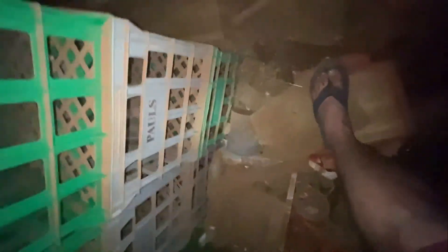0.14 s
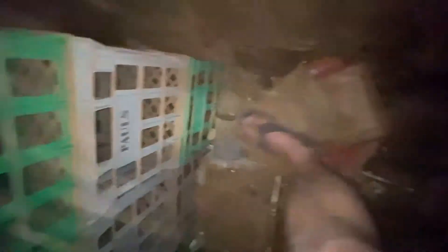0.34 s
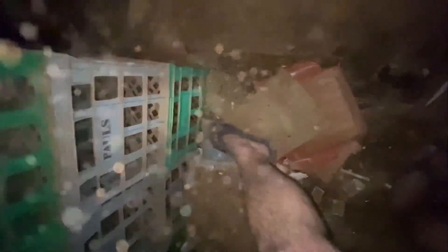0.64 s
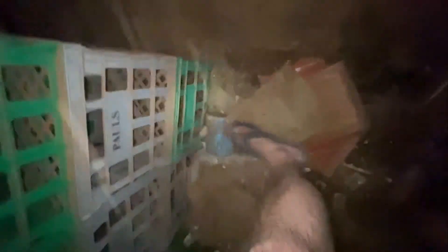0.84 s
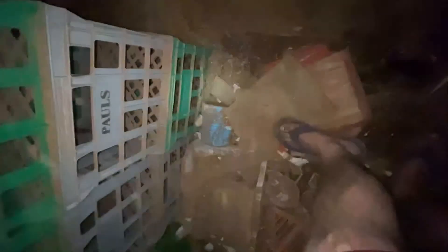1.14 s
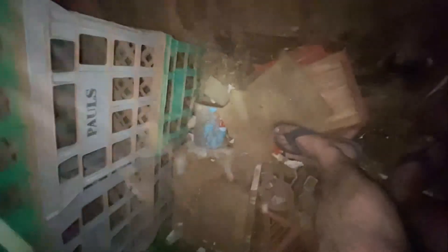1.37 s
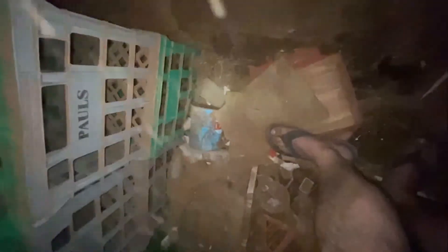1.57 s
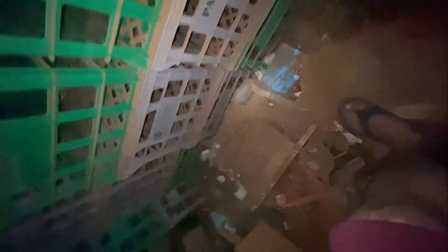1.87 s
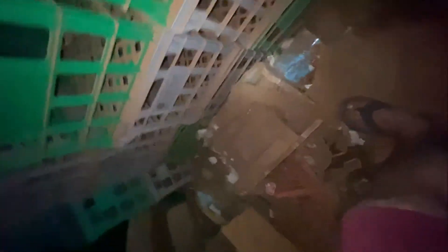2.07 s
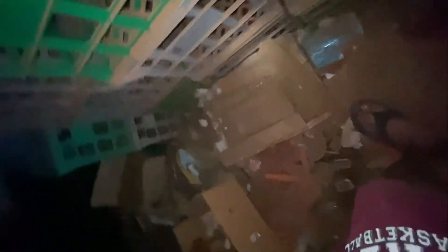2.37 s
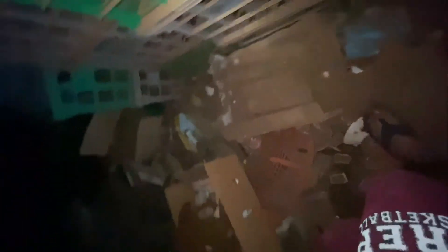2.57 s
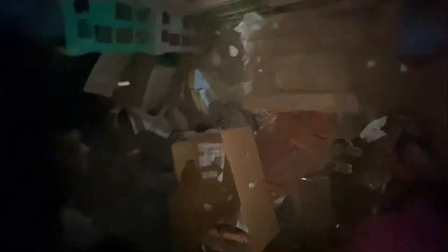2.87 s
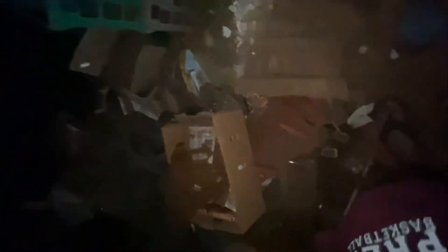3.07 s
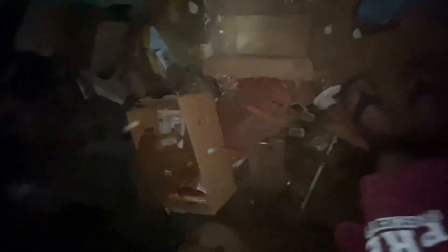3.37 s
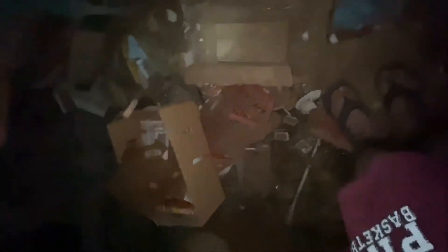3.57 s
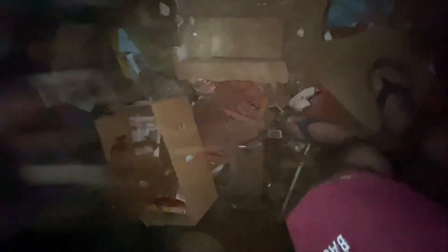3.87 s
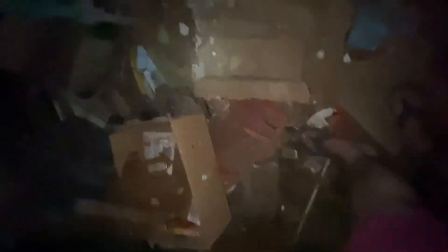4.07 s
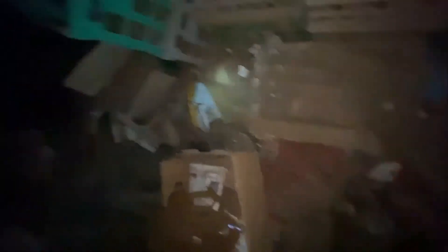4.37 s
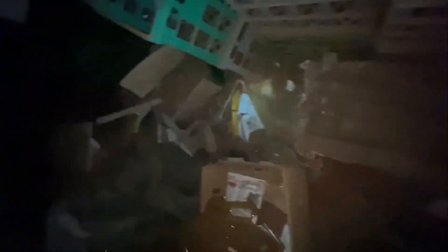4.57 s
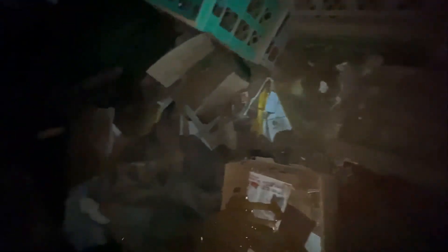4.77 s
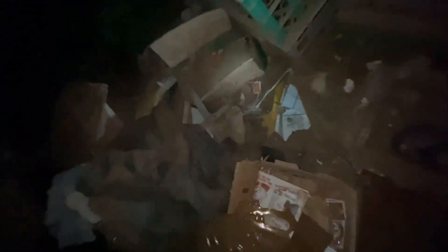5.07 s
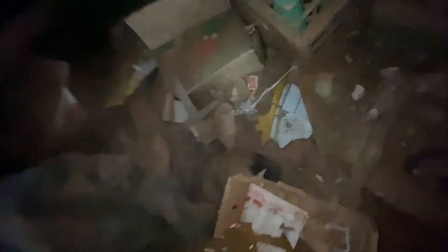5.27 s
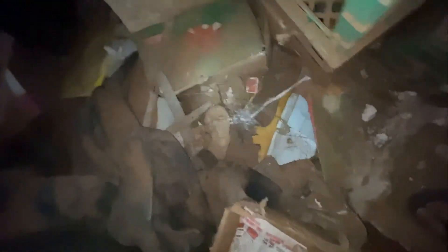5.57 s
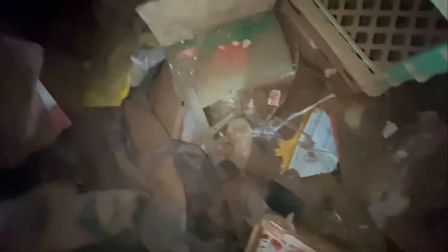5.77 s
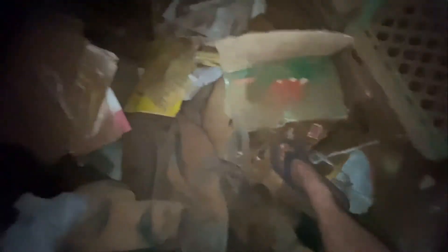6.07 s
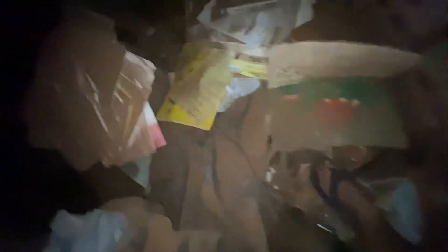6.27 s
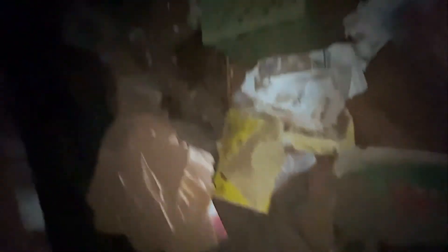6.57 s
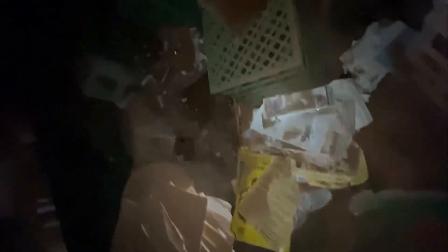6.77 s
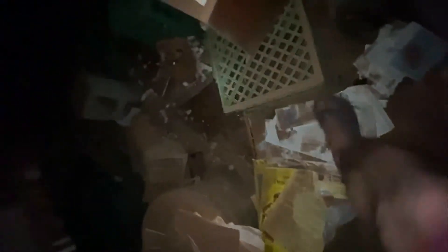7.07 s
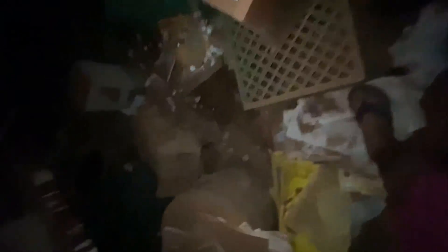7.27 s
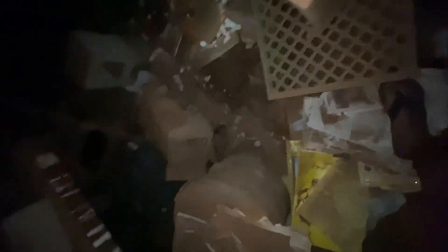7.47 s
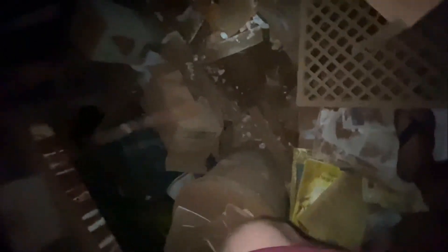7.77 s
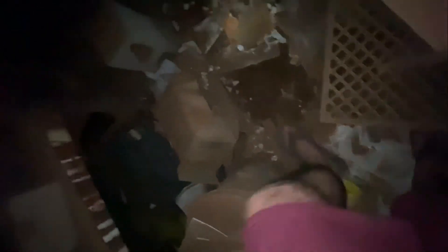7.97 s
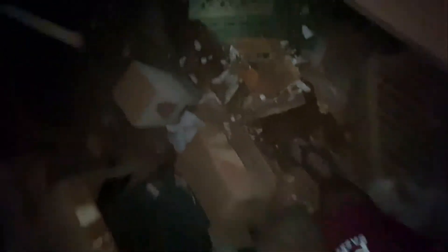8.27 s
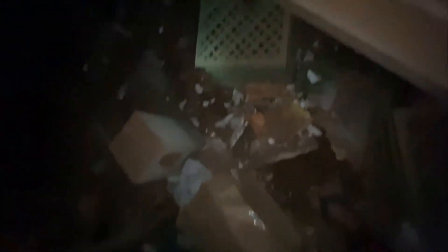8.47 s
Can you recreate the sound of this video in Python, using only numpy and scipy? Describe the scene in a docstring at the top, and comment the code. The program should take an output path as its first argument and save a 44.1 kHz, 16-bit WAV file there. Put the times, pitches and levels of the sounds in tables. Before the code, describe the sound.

A close, dry stereo perspective in an open shed with a short scattered tail and very faint low air. After a light scuff, a plastic crate is shoved at about 0.5 s, juddering and ringing hollowly until 0.7, with small scrapes and ticks to 1.1. A quiet gap follows. From 1.8 rubbing resumes, growing into firm cardboard-on-plastic scrapes at 2.4-2.9. At 3.1 a crate slams down, by far the loudest event: a hard knock, cracking rim and brief deep boom beneath. Smaller snaps follow, with a sharp cluster around 4.0 and a strong hollow box knock at 4.5. Dry scuffs and crackles come at 4.8-5.5, then near silence. At 6.1 a foot crunches into boxes and crisp wrappers; a soft low thump follows at 6.5. Another heavy, crackling tread lands at 7.1, then faint hollow rubbing, and light scuffs and soft knocks at 8.1-8.5.

```python
"""Plastic crates are shifted and cardboard and wrappers waded through, in sandals, close to the microphone.
The place is an open shed: rubbing noise scrapes and crinkles at each shove, edges snap as short noise bursts,
and struck boxes, feet and pushed crates ring as clusters of decaying modes.
Once a crate is set down hard: it knocks, its rim cracks, and the box under it booms.
A short scattered tail and faint low-heavy air surround it, heard through two close microphone ports."""
import sys
import numpy as np
from scipy import signal
from scipy.fft import rfft, irfft, next_fast_len
from scipy.io import wavfile
from scipy.ndimage import uniform_filter1d, map_coordinates

SR = 44100
rng = np.random.default_rng(int(sys.argv[2]) if len(sys.argv) > 2 else 0)


def dump(signal):
    """Clip the signal to [-1, 1] and save it as 16-bit WAV at the path in sys.argv[1]."""
    limited = np.clip(np.atleast_2d(signal).T, -1, 1)
    pcm = np.round(limited * 32767).astype(np.int16)
    wavfile.write(sys.argv[1], SR, pcm)


N = 380583

GRIP_DB_PER_S = 599.5  # how fast shoves and hums take hold
LOOSE_HZ = 1620  # middling pitch of the loose bits, and of the contact before any shove


def amp(db):
    """Decibels to gain."""
    return 10 ** (np.asarray(db) / 20)


def unit(x):
    """Scale to rms 1."""
    return x / np.sqrt(np.mean(x ** 2) + 1e-20)


def along(points, hz):
    """(frequency [Hz], value) points read on a log frequency axis."""
    f, v = np.transpose(points)
    return np.interp(np.log(hz + 1), np.log(f + 1), v)


def wobble(rate):
    """A smooth random curve, rate knots a second."""
    knots = rng.standard_normal(int(N * rate / SR) + 4)
    return map_coordinates(knots, [np.arange(N) * rate / SR])


def filtered(x, response):
    """x times a response of frequency."""
    n = x.shape[-1]
    m = next_fast_len(n + 8192)
    hz = np.fft.rfftfreq(m, 1 / SR)
    return irfft(rfft(x, m) * response(hz), m)[..., :n]


def coloured(x, spectrum):
    """x through a spectrum, at rms 1."""
    return unit(filtered(x, lambda hz: amp(along(spectrum, hz))))


def hump(hz, centre_hz, octaves):
    """Gain of a broad resonance."""
    return 1 / (1 + (np.log2((hz + 1) / centre_hz) / octaves) ** 2)


def add(track, s, sound):
    """Mix a sound into the track at a time."""
    part = track[round(s * SR):][:len(sound)]
    part += sound[:len(part)]


def swell(start_s, hold_s, rise_db_per_s, fall_db_per_s):
    """Gain that rises to 1 at the start, holds, then dies away."""
    t = np.arange(N) / SR - start_s
    db = rise_db_per_s * np.minimum(t, 0) - fall_db_per_s * np.maximum(t - hold_s, 0)
    gain, heard = np.zeros(N), db > -80
    gain[heard] = amp(db[heard])
    return gain


def effort():
    """Hollow, scrape and crinkle gains and contact pitch: shoves grip, hold, let go and leave litter settling."""
    # faint rustle between the shoves: (time [s], gain [dB])
    stir_points = [(0.0, -60), (0.46, -67), (0.6, -83.5), (1.71, -84.5), (1.9, -63), (3.27, -55.5),
                   (3.75, -72), (4.13, -53), (4.42, -60.5), (4.62, -82.5), (6.1, -59.5), (6.25, -52),
                   (7.07, -67), (7.26, -55), (7.64, -70), (8.63, -65)]
    # shoves: (start [s], hold [s], scrape gain [dB], hollow box over the scrape [dB],
    #          crinkle over the scrape [dB], resonance of the rubbed piece [Hz])
    shove_rows = [(0.12, .05, -54, -8, -4, 1487), (0.526, .015, -46.5, 0, 0.5, 2310),
                  (0.549, 0.069, -45.5, -1.5, 0.5, 1275), (0.7, 0.023, -50.5, -7, -0.5, 2985),
                  (0.792, 0.017, -53, 6.5, 2, 1094), (0.995, 0.02, -47.5, -6.5, -3.5, 1200),
                  (1.029, 0.036, -53.5, 5.5, -2, 600), (1.761, .11, -54, -1, -4.5, 1801),
                  (1.934, 0.02, -53, -4.5, -3.5, 3096), (2.005, 0.043, -52.5, -5, 0.5, 1525),
                  (2.107, 0.091, -51, 2, -5.5, 2990), (2.404, 0.074, -47.5, -15, -7.5, 2080),
                  (2.458, 0.045, -39, -6.5, -7, 2063), (2.532, .05, -38, -1, -5, 1085),
                  (2.644, 0.15, -56, -5, 1, 900), (2.92, 0.043, -38.5, -7, -11, 698),
                  (3.039, .03, -45, -5, -7, 741), (3.088, 0.055, -37.5, -5, -3.5, 2500),
                  (3.179, 0.11, -55, -0.5, -2, 732), (3.43, .15, -51.5, -3.5, -9, 1557),
                  (3.817, 0.019, -63, -1.5, -15, 3745), (3.92, .22, -48.5, -5, -2, 1130),
                  (4.256, 0.086, -53, 2, -5.5, 951), (4.4, 0.14, -44, -5, -5, 764),
                  (4.503, 0.014, -48, 11, 0, 768), (4.832, .03, -51, -16, -8, 3726),
                  (4.89, .08, -47, -15.5, -7.5, 2445), (5.011, .07, -55.5, 3, -1, 1892),
                  (5.317, 0.0097, -48.5, -8.5, -15, 719), (5.403, .08, -47.5, -7.5, -4.5, 2233),
                  (6.086, 0.11, -40.5, -1, -2.5, 700), (6.225, 0.046, -43, -4.5, -2.5, 1000),
                  (6.321, 0.2, -53.5, -3.5, -3, 2353), (6.598, 0.13, -59.5, 6.5, -11, 3703),
                  (6.739, 0.2, -63.5, -1, -6, 3800), (7.07, 0.016, -51.5, 1.5, -8.5, 1495),
                  (7.1, .115, -45, 2, -3, 1854), (7.253, .135, -51, 2, -4.5, 1415),
                  (7.459, .15, -59.5, -3.5, -9.5, 2600), (8.143, .02, -52, 0, -7, 1197),
                  (8.192, 0.25, -56.5, -4, -6, 2590), (8.31, 0.15, -54, 0.5, -7.5, 2984)]
    release_db_per_s, settle_db, settle_db_per_s = 328.5, -10.5, 113
    times, levels = np.transpose(stir_points)
    stir = amp(np.interp(np.arange(N) / SR, times, levels))
    power = np.outer(amp([-12, -4.5, -6.5]), stir) ** 2  # hollow, scrape, crinkle
    hardest, pitch_hz = np.zeros(N), np.full(N, float(LOOSE_HZ))
    for s, hold_s, db, hollow_db, crinkle_db, contact_hz in shove_rows:
        push = swell(s, hold_s, GRIP_DB_PER_S, release_db_per_s)
        settle = amp(settle_db) * swell(s, hold_s, GRIP_DB_PER_S, settle_db_per_s)
        gain = amp(db) * np.maximum(push, settle)
        power += np.outer(amp([hollow_db, 0, crinkle_db]) ** 2, gain ** 2)
        # the piece rubbed hardest sets the contact pitch
        pitch_hz = np.where(gain > hardest, contact_hz, pitch_hz)
        hardest = np.maximum(gain, hardest)
    hollow, scrape, crinkle = np.sqrt(power)
    return hollow, scrape, crinkle, pitch_hz


def slips(rate, spread_db, smooth, patchy_db):
    """Tiny uneven stick-slip pulses over smooth friction; the resonances shift as the contact moves."""
    chance, size, grit = rng.random(N), rng.standard_normal(N), rng.standard_normal(N)
    pulses = unit((chance < rate / SR) * np.sign(grit) * amp(spread_db * np.minimum(size, 2)))
    z = signal.stft(pulses + smooth * rng.standard_normal(N), nperseg=512)[2]
    # random gains, smoothed over frequency and then over time
    field = uniform_filter1d(rng.standard_normal(z.shape), size=2, axis=0)
    field = uniform_filter1d(field, size=7, axis=1)
    return signal.istft(z * amp(patchy_db * unit(field)), nperseg=512)[1][:N]


def resonating(x, pitch_hz):
    """The piece being rubbed adds a resonance of its own, which changes with the shoves."""
    hz, t, z = signal.stft(x, SR, nperseg=512)
    centre_hz = np.interp(t, np.arange(N) / SR, pitch_hz)
    contact = amp(-3) * hump(hz[:, None], centre_hz, octaves=.3)
    return unit(signal.istft(z * (1 + contact), SR, nperseg=512)[1][:N])


def rubbing(hollow_gain, scrape_gain, crinkle_gain, contact_hz):
    """Shoves drag card and plastic over each other: boxes drone, edges scrape, wrappers crinkle."""
    # spectra of boxes, edges and wrappers: (frequency [Hz], relative level [dB])
    hollow_spectrum = [(60, -33.5), (150, -8.5), (230, -2), (340, -1), (480, 0), (620, -7), (1000, -39.5)]
    scrape_spectrum = [(250, -30), (500, -13.5), (680, -5.5), (1200, -10.5), (1800, -12), (2400, -9),
                       (3400, -15), (5500, -30)]
    crinkle_spectrum = [(1800, -30), (3400, -4.5), (4000, -2.5), (4800, -6.5), (5700, -1), (8000, -4),
                        (10500, -7), (12500, -14), (15800, -24)]
    judder = 0.85 * wobble(130) + 1.43 * wobble(35)  # the whole load catches and lets go
    hollow = coloured(slips(700, 1.8, smooth=0.86, patchy_db=5.0), hollow_spectrum)
    hollow = hollow * hollow_gain * amp(1.4 * judder)
    scrape = coloured(slips(600, 2.8, smooth=0.6, patchy_db=3.2), scrape_spectrum)
    scrape = resonating(scrape, contact_hz) * scrape_gain * amp(0.7 * judder)
    crinkle = coloured(slips(1600, 2.6, smooth=1.0, patchy_db=2.8), crinkle_spectrum)
    crinkle = crinkle * crinkle_gain * amp(1.8 * judder)
    return amp(-.5) * hollow + amp(-1.0) * scrape + amp(3.0) * crinkle


def rattles(scrape_gain, count):
    """Rows like those of the snaps: loose bits tick at random, as hard as they are being shoved."""
    level_db, spread_db, octaves, t60_s = -2.5, 1.5, 0.85, .025  # level over the scrape gain
    at = (rng.random(count) * N).astype(int)
    size, pitch = np.clip(rng.standard_normal((count, 2)), -2, 2).T
    db = 20 * np.log10(scrape_gain[at]) + level_db + spread_db * size
    pitch_hz = LOOSE_HZ * 2 ** (.6 * pitch)
    return np.column_stack([at / SR, db, pitch_hz, np.full(count, octaves), np.full(count, t60_s)])


def burst(length, pitch_hz, octaves, ripple_db):
    """Noise of rms 1 from a crowd of modes: a bell around the pitch, with a few modes standing out."""
    knots = rng.standard_normal(80)

    def response(hz):
        bell = np.exp(-(np.log2((hz + 1) / pitch_hz) / max(octaves, .2) / 2) ** 2) / np.sqrt(hz + 600)
        ripple = map_coordinates(knots, [np.sqrt(hz / hz[-1]) * (len(knots) - 1)])
        low_cut = hz / (hz + 250)
        high_cut = 1 / np.sqrt(1 + (hz / 11000) ** 10)
        return bell * amp(ripple_db * ripple) * low_cut * high_cut

    return unit(filtered(rng.standard_normal(length), response))


def thin(x, pitch_hz):
    """A small piece radiates little far below its own pitch."""
    cut_hz = min(pitch_hz / 4, SR / 4)
    return signal.sosfilt(signal.butter(2, cut_hz, "high", fs=SR, output="sos"), x)


def snaps(rows):
    """A snap swells faintly for an instant, then bursts and rings its well-damped modes."""
    out = np.zeros(N)
    swell_s = .01
    t = np.arange(SR // 6) / SR - swell_s  # zero at the burst
    faint = amp(-22.5 + 60 * np.minimum(t, 0) / .025)
    for s, db, pitch_hz, octaves, t60 in rows:
        decay = amp(-60 * np.abs(t) / t60) + amp(-27 - 60 * np.abs(t) / 0.13)  # ring and fainter tail
        envelope = np.where(t < 0, faint, decay)
        snap = thin(burst(len(t), pitch_hz, octaves, ripple_db=4.0) * envelope, pitch_hz)
        # the level counts the snap's whole energy as if spread over swell_s
        add(out, max(s - swell_s, 0), amp(db) * snap / np.sqrt(np.sum(snap ** 2) / (swell_s * SR)))
    return out


def knocks():
    """A soft blow or footfall rings a cluster of panel modes; big panels are low and slow."""
    # hollow knocks and footfalls: (time [s], peak level [dB], pitch [Hz])
    knock_rows = [(0.166, -40.5, 168.4), (.556, -28, 482), (0.595, -23.5, 437.5), (.812, -35.5, 288),
                  (1.016, -37, 621), (1.077, -41.5, 515), (2.155, -42.5, 138.4), (2.562, -25.5, 1004),
                  (2.924, -42.5, 130), (3.127, -26, 66.3), (3.335, -40.5, 108.6), (3.592, -44.5, 103.9),
                  (4.04, -35, 435.4), (4.503, -18.5, 504), (4.553, -40.5, 199.5), (5.011, -33, 425),
                  (5.016, -36, 221), (5.325, -29.5, 745), (6.091, -25, 557.4), (6.122, -27, 340.2),
                  (6.177, -34, 148.6), (6.515, -35.5, 120.2), (6.54, -38.5, 52.5), (7.119, -32, 113.3),
                  (7.128, -29, 245.5), (7.19, -32, 280), (7.212, -28.5, 245.2), (7.61, -41.5, 330.7),
                  (8.141, -36, 259.8), (8.456, -34.5, 406.5), (8.474, -32.5, 135)]
    panel = [(.63, -7), (.92, -3.5), (1.09, -3), (1.37, -6.5), (1.9, -10), (2.7, -16.5)]  # (multiple, [dB])
    panel_hz, panel_t60_s, damping = 302, 0.085, 0.35  # ring shortens with this power of the pitch
    sag, sag_s = 0.27, .08  # the pitch sinks towards this share lower as the struck card gives way
    out, t = np.zeros(N), np.arange(SR // 2) / SR
    sinking = np.cumsum(1 - sag * (1 - np.exp(-t / sag_s))) / SR
    for s, db, pitch_hz in knock_rows:
        t60 = panel_t60_s * (panel_hz / pitch_hz) ** damping
        ring = np.zeros(len(t))
        for k, level in panel:
            gain = amp(level + rng.normal(0, 0.26) - 60 * t * np.sqrt(k) / t60)
            mode_hz = pitch_hz * k * (1 + rng.normal(0, 0.037))
            ring += gain * np.sin(2 * np.pi * mode_hz * sinking + rng.uniform(0, 2 * np.pi))
        ring = ring * (1 - np.exp(-t * pitch_hz / .8))  # soft onset
        add(out, s, amp(db) * ring / np.abs(ring).max())
    return out


def treading(hollow_gain):
    """Body weight makes the flattened boxes rumble, and every shove shakes them a little."""
    # weight put on the boxes: (time [s], gain [dB])
    tread_rows = [(0.181, -60.5), (0.54, -52), (1.06, -56.5), (2.16, -60), (3.125, -43.5), (3.44, -55.5),
                  (4.0, -58.5), (4.521, -58.5), (5.03, -59.5), (5.39, -53), (6.12, -46), (6.525, -51.5),
                  (7.098, -41.5), (7.36, -50), (8.17, -54), (8.48, -52.5)]
    # rumble of the boxes on the ground: (frequency [Hz], relative level [dB])
    ground_spectrum = [(20, -26.5), (45, -4), (70, 3.5), (110, 3.5), (160, -3.5), (300, -36.5)]
    weight = sum(amp(db) * swell(s, 0, rise_db_per_s=449, fall_db_per_s=72.5) for s, db in tread_rows)
    drag = amp(-17) * hollow_gain
    return coloured(rng.standard_normal(N), ground_spectrum) * np.hypot(weight, drag)


def wavering(hz, t):
    """A mode of a loose wall that keeps shifting its pitch at random, anew every few cycles."""
    share, cycles = 0.053, 4
    drift = np.interp(t * hz / cycles, np.arange(len(t)), rng.standard_normal(len(t)))
    return np.sin(2 * np.pi * hz * np.cumsum(1 + share * drift) / SR)


def skids():
    """A pushed crate catches and jumps; each catch rings its walls a little differently, damped by the ground."""
    # catches: (time [s], peak level [dB])
    skid_rows = [(0.468, -22.5), (.509, -33), (.555, -23.5), (.574, -25.5), (.588, -19.5), (.613, -25),
                 (.634, -33), (.707, -36), (.722, -36)]
    # walls of the pushed crate: (frequency [Hz], relative level [dB])
    wall_modes = [(185, -7.5), (308, 2), (440, -7), (520, -10.5), (845, -15), (975, -18), (1300, -17),
                  (1800, -20.5), (2320, -17)]
    scatter_db, detune = 3.5, 0.038  # from catch to catch: level of each mode, share of its pitch
    t60_s, rise_cycles = .052, 1.5
    out, t = np.zeros(N), np.arange(SR // 4) / SR
    for s, db in skid_rows:
        ring = np.zeros(len(t))
        for hz, level in wall_modes:
            gain = amp(level + scatter_db * rng.normal()) * (1 - np.exp(-t * hz / rise_cycles))
            ring += gain * wavering(hz * (1 + detune * rng.normal()), t) * rng.choice([-1, 1])
        ring = ring * amp(-60 * t / t60_s)
        add(out, s, amp(db) * ring / np.abs(ring).max())
    return out


def cracks():
    """Rows like those of the snaps: crushed litter buckles in a quick, uneven run of dry cracks."""
    # card and wrappers giving way: (start [s], length [s], middling level [dB], middling pitch [Hz])
    crunch_rows = [(.545, .075, -45, 2200), (4.896, .095, -52.5, 2270), (5.392, .07, -53, 2406),
                   (6.09, .115, -42.5, 1700), (7.094, .06, -43.5, 1596), (7.165, .06, -46.5, 1783)]
    per_s, spread_db, octaves, t60_s = 110, 3.5, 1, .011
    rows = []
    for start_s, length_s, db, pitch_hz in crunch_rows:
        for s in np.arange(start_s, start_s + length_s, 1 / per_s):
            size, pitch = np.clip(rng.standard_normal(2), -2, 2)
            crack_s = s + rng.random() / per_s
            rows.append((crack_s, db + spread_db * size, pitch_hz * 2 ** (pitch / 2), octaves, t60_s))
    return rows


def droning():
    """A narrow, hollow hum: under an early big shove, then faintly under a run of shoves and twice in a later lull."""
    # hums: (start [s], hold [s], gain [dB])
    hum_rows = [(0.594, 0.11, -53), (2.254, 0.84, -60), (7.595, 0.17, -60.5), (7.867, 0.219, -61)]
    hum = filtered(rng.standard_normal(N), lambda hz: hump(hz, centre_hz=340, octaves=0.45) ** 2)
    gain = sum(amp(db) * swell(s, hold_s, GRIP_DB_PER_S, fall_db_per_s=245.5) for s, hold_s, db in hum_rows)
    return unit(hum) * gain


def crate():
    """The crate lands in a quick run of contacts, each waking the wall modes near its own centre."""
    # contacts: (time [s], peak level [dB], centre of the blow [Hz])
    blow_rows = [(3.11, -6.5, 735), (3.113, -16, 170), (3.1192, -11.5, 434), (3.124, -4.5, 2325),
                 (3.129, -15.5, 297.2)]
    # the crate's walls: (frequency [Hz], relative level [dB], t60 [s])
    wall_modes = [(189, -8.5, 0.19), (260, -9, 0.097), (393.6, -2.5, 0.14), (513, 1, 0.09), (630, 1, 0.037),
                  (745, -6.5, 0.05), (870, -5, 0.05), (1030, 3, 0.046), (1270, 3, 0.052),
                  (2326, 0.5, 0.037), (2580, -2, 0.035), (3065, -2.5, 0.013), (3490, -2, 0.035)]
    out, t = np.zeros(N), np.arange(SR // 2) / SR
    for s, db, centre_hz in blow_rows:
        ring = np.zeros(len(t))
        for k, (hz, level, t60) in enumerate(wall_modes):
            gain = amp(level - 60 * t / t60) * hump(hz, centre_hz, 0.75)
            ring += (-1) ** k * gain * wavering(hz, t)
        ring = ring * (1 + np.exp(-t * centre_hz / 6))  # the first swings are up to twice as strong
        crack = burst(len(t), centre_hz, 0.18, ripple_db=2.0) * amp(-10 - 60 * t / 0.033)
        blow = ring / np.abs(ring).max() + crack
        add(out, s, amp(db) * blow / np.abs(blow).max())
    return out


def booming():
    """The broad side of a loaded box swings at one low pitch, unevenly, until the weight settles."""
    # booms: (time [s], gain [dB], pitch [Hz], hold [s])
    boom_rows = [(3.116, -27.5, 96, 0.053), (6.576, -42.5, 68.1, 0.055)]
    t = np.arange(N) / SR
    swing = np.zeros(N)
    for s, db, hz, hold_s in boom_rows:
        gain = amp(db) * swell(s, hold_s, rise_db_per_s=1502, fall_db_per_s=261.5)
        swing += gain * wavering(hz, t)
    return swing * amp(3 * wobble(35))


def shed(x):
    """Stacked boxes and the roof scatter a short tail, shorter in the treble."""
    # decay of the place: (frequency [Hz], t60 [s])
    decay_points = [(100, 0.92), (500, 0.47), (3000, 0.23), (12000, 0.069)]
    hz, t, z = signal.stft(rng.standard_normal(SR // 2), SR, nperseg=256)
    decay = amp(-60 * t / along(decay_points, hz)[:, None])
    tail = signal.istft(z * decay, SR, nperseg=256)[1]
    delayed = np.pad(x, (300, 0))  # samples before the tail begins
    return signal.fftconvolve(delayed, tail / np.linalg.norm(tail))[:N]


def ports(x, lead_s):
    """Two close microphone ports: one hears slightly first, and scattered points of the litter blur the treble."""
    # likeness of the ports: (frequency [Hz], correlation between the ports [0-1])
    likeness = [(100, 0.97), (260, 0.92), (500, 0.8), (1000, 0.88), (2200, 0.8), (5000, 0.18),
                (12000, 0.63)]
    # tilt between the ports: (frequency [Hz], leading port minus the other [dB])
    tilt = [(60, -1.5), (180, -1), (350, -2), (650, -4.5), (1200, -0.5), (2800, -1.5), (5000, -0.5),
            (12000, 0.5)]
    z = signal.stft(x, nperseg=128)[2]
    stray = signal.istft(z * np.exp(2j * np.pi * rng.random(z.shape)), nperseg=128)[1][:N]
    stray = unit(stray) * np.std(x)  # same sound, scrambled phases

    def turn(hz):
        return np.arccos(np.clip(along(likeness, hz), 0, 1)) / 2

    mid = filtered(x, lambda hz: np.cos(turn(hz)))
    side = filtered(stray, lambda hz: np.sin(turn(hz)))
    sign = np.array([[1], [-1]])  # leading port, other port

    def placing(hz):
        return amp(sign * along(tilt, hz) / 2) * np.exp(1j * np.pi * sign * hz * lead_s)

    return filtered(mid + sign * side, placing)


def scene():
    """All the handling, the shed's answer and the still air."""
    # snaps of plastic and card: (time [s], level [dB], pitch [Hz], spread [octaves], t60 [s])
    snap_rows = [(0.06, -40, 1485, 0.16, .03), (0.464, -42, 1870, 0.54, 0.05),
                 (.553, -41.5, 1940, 0.3, .025), (.582, -35, 3400, .9, .025), (0.607, -35, 1420, 0.6, .025),
                 (.636, -41.5, 1364, 0.22, .05), (.708, -47.5, 2720, .9, .04),
                 (0.785, -38.5, 4494, 1.6, .06), (1.076, -37.5, 2600, 1.5, .016),
                 (1.392, -55, 4400, 0.83, .025), (1.998, -42, 4040, 2.1, .035),
                 (2.057, -40.5, 2486, 1.2, .035), (2.102, -35.5, 3785, 1.3, .03),
                 (2.397, -46.5, 2308, 1, .035), (2.469, -33.5, 2640, 1.5, .07),
                 (2.657, -42.5, 3720, 0.74, .04), (2.741, -43, 1382, .9, .04),
                 (3.075, -30, 3210, 1.6, .025), (3.22, -37.5, 1334, 1.1, .04),
                 (3.356, -37.5, 3060, 1.5, .035), (3.401, -44.5, 2360, 1.2, .03),
                 (3.451, -43.5, 1780, .9, .035), (3.586, -45.5, 1538, 0.58, .04),
                 (3.801, -40, 2110, 1.8, .04), (3.932, -32, 5660, 0.7, .045),
                 (3.988, -26.5, 2350, 1.6, .028), (4.041, -29.5, 1364, 0.82, .028),
                 (4.128, -36.5, 3630, 1.4, .03), (4.269, -35.5, 1174, 0.65, .02),
                 (4.285, -41.5, 1740, 1.5, .02), (4.344, -38, 1051, .55, .035),
                 (4.375, -36, 869, 0.72, .035), (4.498, -24, 1012, .58, .04), (4.52, -36, 2182, 2.7, .04),
                 (4.812, -34.5, 2515, 0.87, .019), (5.011, -46, 982, .6, 0.033),
                 (5.305, -45, 1172, 0.95, .035), (5.471, -34.5, 2167, 0.22, .025),
                 (5.793, -49, 3770, 0.65, .04), (6.09, -29.5, 1618, 1.7, .06),
                 (6.125, -33.5, 797, 0.43, .05), (6.159, -29, 3536, 1.3, .05),
                 (6.187, -25.5, 4380, 1.2, .03), (6.247, -39, 900, .7, .04), (6.264, -39.5, 3000, 1.1, .03),
                 (6.516, -39, 4824, 1.1, .03), (6.653, -38, 5230, 1.5, .035), (7.088, -42.5, 938, .6, .015),
                 (7.119, -35, 790, .7, .03), (7.141, -37, 1917, 0.7, .04), (7.191, -41.5, 1684, 0.78, .035),
                 (7.211, -42.5, 1503, .9, .025), (7.294, -45, 1498, 0.81, .05),
                 (7.37, -45.5, 2200, .6, .025), (7.387, -42.5, 2696, 0.46, .012),
                 (7.493, -52, 4300, 1, 0.019), (8.048, -54.5, 2090, 0.63, 0.0253),
                 (8.14, -43, 1370, 1.1, .025), (8.454, -41.5, 1245, 0.72, .025)]
    # background air: (frequency [Hz], relative level [dB])
    air_spectrum = [(15, -55.5), (25, -26.5), (58, 2.5), (75, -3.5), (129, -36.5), (274, -19), (919, -40.5),
                    (1660, -38.5), (11000, -50), (15500, -62.5)]
    hollow, scrape, crinkle, contact_hz = effort()
    near = rubbing(hollow, scrape, crinkle, contact_hz) + droning() + treading(hollow)
    near = near + snaps(snap_rows) + knocks() + skids() + crate() + booming()
    near = near + snaps(rattles(scrape, count=200)) + snaps(cracks())
    air = amp(-77) * coloured(rng.standard_normal(N), air_spectrum)
    tails = np.array([shed(near), shed(near)])  # a separate tail for each side
    diffuse = amp(-25) * filtered(tails, lambda hz: hz / (hz + 350))
    return ports(near + amp(-18.0) * shed(near) + air, lead_s=.00004) + diffuse


def record(dry):
    """The recorder keeps nothing above its band limit."""
    top_hz = 15900
    return filtered(dry, lambda hz: hz < top_hz)


dry = scene()
out = record(dry)
dump(out)
```